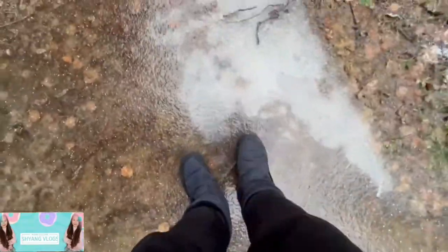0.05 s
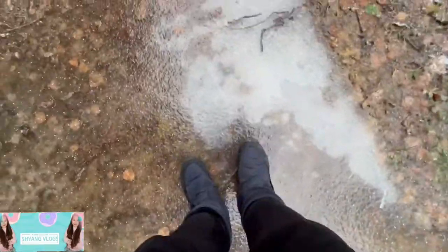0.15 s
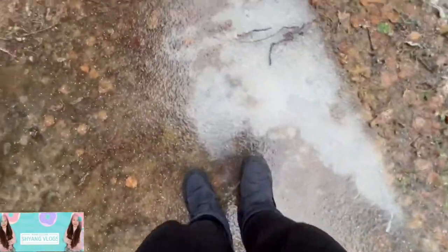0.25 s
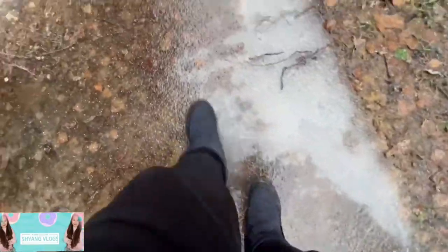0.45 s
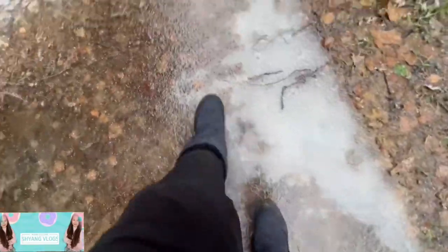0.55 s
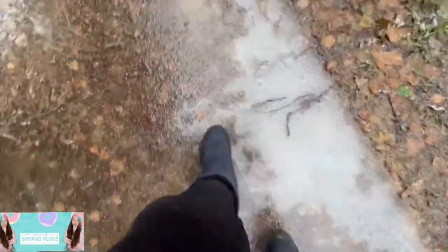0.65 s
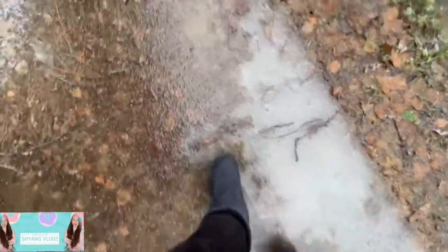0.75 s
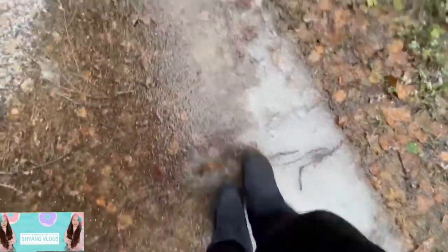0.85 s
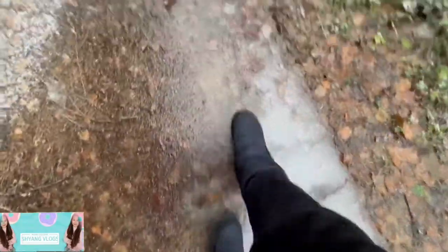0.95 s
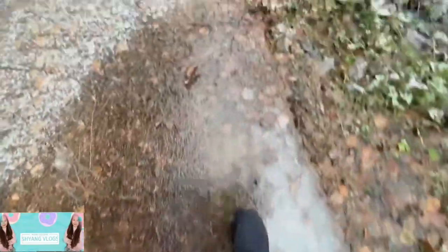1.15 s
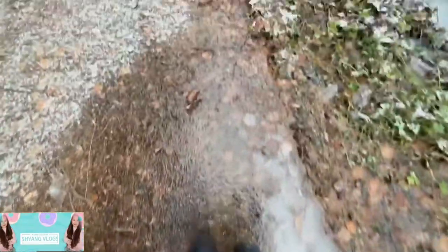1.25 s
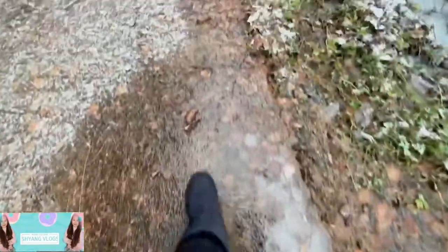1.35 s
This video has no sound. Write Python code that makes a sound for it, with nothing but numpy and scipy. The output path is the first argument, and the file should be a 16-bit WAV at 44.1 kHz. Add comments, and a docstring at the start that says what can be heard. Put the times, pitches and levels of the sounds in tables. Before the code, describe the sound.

Boots step on a frozen puddle outdoors and the thin ice breaks with two loud, sharp cracks, with lighter crackling between them. A rubber sole scuffs faintly, while soft wind and low bumps reach the microphone.

```python
"""Low wind rumble and a faint crackle come first, as boots step onto a thin frozen puddle outdoors.
Each crack is a burst of brittle fractures plus a bending wave, which dispersion in the sheet turns
into a downward chirp; crushed ice fizzes between the cracks. Low thumps reach the microphone above,
mostly at its left port, and later a rubber sole scuffs by stick-slip friction."""
import sys
import numpy as np
from scipy import signal
from scipy.fft import rfft, irfft, next_fast_len
from scipy.io import wavfile
from scipy.ndimage import uniform_filter1d, map_coordinates

SR = 44100
rng = np.random.default_rng(int(sys.argv[2]) if len(sys.argv) > 2 else 0)


def transcribe(u):
    """Save the signal u as a 16-bit wav file named by the first command-line argument.

    u: samples, shape (n,) or (channels, n), limited to [-1, 1]; the rate is SR.
    q: integer samples, one column per channel.
    """
    v = np.clip(np.atleast_2d(u).T, -1, 1)
    q = np.round(v * 32767).astype(np.int16)
    wavfile.write(sys.argv[1], SR, q)


N = 61739
PORT_LAG_S = 0.0001  # a crack reaches the left port this much later than the right


def amp(db):
    """Amplitude ratio of a level in decibels."""
    return 10 ** (np.asarray(db) / 20)


def unit(x):
    """Normalisation to rms 1."""
    return x / np.sqrt(np.mean(x ** 2) + 1e-20)


def along(points, hz):
    """Interpolation of (f/Hz, value) points on a logarithmic frequency axis."""
    f, v = np.transpose(points)
    return np.interp(np.log(hz + 1), np.log(f + 1), v)


def clock():
    """Time of each sample in seconds."""
    return np.arange(N) / SR


def envelope(points):
    """Amplitude envelope through (t/s, level/dB) points."""
    return amp(np.interp(clock(), *np.transpose(points)))


def filtered(x, response):
    """Linear filtering: the spectrum of x times a complex frequency response."""
    m = next_fast_len(N + SR // 4)
    return irfft(rfft(x, m) * response(np.fft.rfftfreq(m, 1 / SR)), m)[..., :N]


def coloured(x, spectrum):
    """Spectral shaping by (f/Hz, relative level/dB) points, at rms 1."""
    return unit(filtered(x, lambda hz: amp(along(spectrum, hz))))


def resonance_db(hz, centre_hz, height_db, octaves):
    """A resonance peak, Gaussian in log frequency."""
    return height_db * np.exp(-(np.log2((hz + 1) / centre_hz) / octaves) ** 2)


def panned(pan_db):
    """Channel gains for a level difference, left minus right."""
    return amp([[pan_db / 2], [-pan_db / 2]])


def noise(correlation):
    """Partly coherent white noise in two channels."""
    a, b = rng.standard_normal((2, N))
    angle = np.arccos(np.clip(correlation, -1, 1)) / 2
    common, opposed = np.cos(angle) * a, np.sin(angle) * b
    return np.array([common + opposed, common - opposed])


def grains(per_s, hiss, correlation):
    """Shot noise: random clicks on a bed of hiss."""
    clicks = noise(correlation) * (rng.random(N) < per_s / SR)
    return unit(clicks) + hiss * noise(correlation)


def patchy(x, depth_db, bins=7, frames=14):
    """Random amplitude modulation in patches of frequency and time."""
    spectra = signal.stft(x, nperseg=256)[2]
    field = rng.standard_normal(spectra.shape[1:])
    field = uniform_filter1d(uniform_filter1d(field, bins, 0), frames, 1)
    return signal.istft(spectra * amp(depth_db * unit(field)), nperseg=256)[1][:, :N]


def wind():
    """Pressure fluctuations of the wind rumble almost independently at the two ports."""
    # strength of the gusts: t/s, level/dB
    gusts = [(0, -47.5), (.12, -50), (.22, -44.5), (.26, -44.5), (.38, -43.5), (.49, -39), (.54, -45.5),
             (.59, -56.5), (.78, -67), (.95, -51.5), (.98, -45.5), (1.06, -44.5), (1.11, -49),
             (1.17, -46.5), (1.28, -53.5), (1.38, -44.5)]
    # rumble spectrum: f/Hz, relative level/dB
    spectrum = [(20, -36), (45, -11), (75, -4), (110, -8), (200, -13.5), (350, -15.5), (700, -32.5),
                (2000, -51)]
    return envelope(gusts) * panned(4) * coloured(noise(correlation=-0.0058), spectrum)


def distant_wash():
    """Steady outdoor background, nearly incoherent between the ports as in a diffuse field."""
    # background spectrum: f/Hz, relative level/dB
    spectrum = [(45, -5.5), (80, 10.5), (115, 2.5), (220, -6.5), (720, -4), (930, -10), (1120, -11),
                (1250, 3), (1450, -12), (1750, -10.5), (2200, -2.5), (2700, -12.5), (6500, -22.5),
                (9000, -35), (11500, -59)]
    return amp(-52) * coloured(noise(correlation=0.057), spectrum)


def crushed_ice(clumps_per_s=210, clump_db=2, treble_db=-49, treble_hz=10900, treble_exponent=2.6):
    """Crushing makes shot noise: a fizz of fine crackle that comes in clumps."""
    # strength of the crushing: t/s, level/dB
    crushing = [(0, -59.5), (.065, -56), (.09, -94), (.15, -73), (.2, -58.5), (.24, -49.5), (.29, -48.5),
                (.40, -58), (.46, -60.5), (.50, -53.5), (.56, -49), (.595, -66.5), (.665, -50.5),
                (.695, -54), (.725, -50.5), (.77, -63), (.87, -53), (.91, -57.5), (.925, -52), (.98, -63.5),
                (1.035, -47.5), (1.10, -50.5), (1.17, -57), (1.4, -65.5)]
    # fizz spectrum: f/Hz, relative level/dB
    spectrum = [(400, 1), (1300, 8.5), (3000, 4), (6000, 3), (9000, -5.5), (11000, -4), (13000, -41),
                (15500, -20)]
    clumps = amp(clump_db * map_coordinates(rng.standard_normal(N // 20), [clock() * clumps_per_s]))
    crackle = patchy(clumps * grains(per_s=2500, hiss=0.82, correlation=0.24), depth_db=3.5)
    crush = envelope(crushing)
    # a thin top-treble hiss comes in when the fizz is loudest
    treble = unit(filtered(crackle, lambda hz: hz ** 4 / (hz ** 4 + treble_hz ** 4)))
    treble_gain = amp(treble_db) * (crush / crush.max()) ** treble_exponent
    return crush * coloured(crackle, spectrum) + treble_gain * treble


def bending_wave(at_s, centre_hz, lag_cycles, half_octaves=1.145, slope=2.3, knee_hz=70.9):
    """Dispersion: high frequencies run faster in a plate; group delay is lag_cycles / (f + knee_hz)."""
    def response(hz):
        octaves = np.abs(np.log2((hz + 1) / centre_hz))
        band = np.exp(-octaves / slope) / np.sqrt(1 + (octaves / half_octaves) ** (2 * slope))
        bass = amp(-15.5) * hz ** 2 / (hz ** 2 + knee_hz ** 2) / (1 + (hz / centre_hz) ** 4)
        port = np.array([[.5], [-.5]])
        cycles = hz * (at_s + port * PORT_LAG_S) + lag_cycles * np.log(1 + hz / knee_hz)
        phase = 2 * np.pi * cycles + port * 0.26  # the left port lags a further 0.26 rad
        return (band + bass) * np.exp(-1j * phase)
    wave = filtered(signal.unit_impulse(N), response)
    return wave / np.abs(wave).max()


def fracture(at_s, decay_s, tilt_db, shard_hz, shard_db, rise_ratio=0.66, snap_s=0.00017):
    """Brittle fracture: tiny breaks build to a burst around one clean snap and excite a shard's mode."""
    # fracture spectrum: f/Hz, relative level/dB
    spectrum = [(200, -18.5), (750, 7), (1500, 4.5), (3000, 1), (4200, 0), (6200, 3.5), (8500, -2),
                (11000, -3), (13000, -10), (15500, -11.5)]
    t = clock() - at_s
    strain = amp(-20) * np.exp(-np.abs(t) / 0.004)  # faint breaks on either side of the burst
    shape = np.exp(-np.maximum(t, -t / rise_ratio) / decay_s) + strain
    breaks = noise(correlation=0.18) * np.exp(0.42 * rng.standard_normal(N)) * shape  # log-normal sizes
    snap = np.array([signal.unit_impulse(N, round((at_s + port * PORT_LAG_S) * SR))
                     for port in (.5, -.5)])
    burst = unit(breaks) + snap_s / decay_s * unit(snap)  # the shorter, the more of it is snap
    def colour(hz):
        shard = resonance_db(hz, shard_hz, shard_db, octaves=0.39)
        return amp(along(spectrum, hz) + shard + tilt_db * np.log2(1 + hz / 1000))
    return unit(filtered(burst, colour)) * np.sqrt(np.mean(shape ** 2))


def cracks(lead_s=0.000783):
    """Impulsive excitation: each crack bends and splinters the sheet."""
    # cracks ahead of their tone colour: t/s; bending wave peak level/dB, centre f/Hz, lag/cycles;
    # burst level/dB, decay t/s, tilt/(dB per octave); shard f/Hz, boost/dB; left minus right level/dB
    events = [(0.0113, -48.5, 970, 1.5, -34.5, 0.0019, 7, 6550, 3, 2),
              (0.0498, -48, 793, 1.2, -34.5, 0.0069, 8.5, 3370, 13.5, -1),
              (0.0567, -41.5, 930, 1.2, -45, 0.0029, 2.5, 3330, 17, -15.5),
              (0.171, -71, 900, 1.3, -39.5, 0.0049, -1, 2290, 23.5, -8.5),
              (.2121, -5, 782, 1.131, -11.5, 0.0015, -1, 2530, 7, 0),
              (0.2248, -60, 900, 0.53, -32.5, 0.0016, 9, 2400, 19, -10),
              (0.2674, -29.5, 770, 1.2, -25, 0.00067, 2.5, 6260, 3.5, -6),
              (.3637, -29, 660, 1.4, -23.5, 0.00082, 3.5, 3600, 3.5, -4),
              (0.444, -31.5, 960, 1.4, -31.5, 0.002, 8, 6600, 0, 1),
              (0.4736, -26.5, 1580, 1.2, -25, 0.0012, 4.5, 2050, 14, -3.5),
              (.5175, -63, 900, 1.6, -39, 0.0028, 8, 3600, 15.5, -3),
              (.5500, -34.5, 1010, 1.6, -37.5, 0.005, 13.5, 4160, 18, -4),
              (0.644, -38.5, 980, 1.19, -37, 0.0031, -6.5, 2180, 7, -5),
              (0.7113, -42.5, 990, 1.2, -38, 0.0011, 3, 7900, 9.5, -7.5),
              (0.9186, -32, 900, 1.2, -31.5, 0.0021, 0.5, 2190, 7.5, 0.5),
              (1.0250, -8.5, 503, 1.5, -13.5, 0.00089, 0.5, 3650, 7.5, -4),
              (1.0555, -38, 1280, 1.2, -46, 0.0025, -15, 1770, 22, -20),
              (1.0650, -18, 740, 1.2, -27, 0.0018, -0.5, 1510, 6, -3.5),
              (1.101, -41, 1000, 1.2, -40, 0.004, -1.5, 2500, -10, -0.5)]
    # tone colour of the cracks, with a peak near 1250 Hz between two dips: f/Hz, level/dB
    tone_colour = [(150, 0), (330, 0.5), (520, -2), (760, -0.5), (980, -6), (1250, -0.5), (1650, -5),
                   (2100, -4), (2800, -1), (5000, -1.5)]
    out = np.zeros((2, N))
    for at_s, bend_db, bend_hz, lag, burst_db, decay_s, tilt_db, shard_hz, shard_db, pan_db in events:
        bend = amp(bend_db) * bending_wave(at_s - lead_s, bend_hz, lag)
        burst = amp(burst_db) * fracture(at_s, decay_s, tilt_db, shard_hz, shard_db)
        out += panned(pan_db) * (bend + burst)
    return filtered(out, lambda hz: amp(along(tone_colour, hz)))


def echo(x):
    """Scattering from ground and bushes: convolution with a short, exponentially decaying noise tail."""
    # time to decay by 60 dB: f/Hz, t/s
    t60 = [(200, 0.019), (1500, 0.048), (6000, 0.031), (14000, 0.053)]
    # colour of the scatter: f/Hz, relative level/dB
    colour = [(200, -7), (1000, -0.5), (2500, -5), (6000, -1), (14000, 1)]
    hz, t, spectra = signal.stft(rng.standard_normal((2, SR // 4)), SR, nperseg=256)
    decay = amp(-60 * t / along(t60, hz)[:, None])
    tail = signal.istft(spectra * decay, SR, nperseg=256)[1]
    scatter = signal.fftconvolve(x, tail / np.linalg.norm(tail[0]), axes=1)[:, :N]
    return filtered(scatter, lambda f: amp(along(colour, f)))


def thumps(sag_per_s=57.6, roughness=0.4, right_db=-10.5):
    """Gaussian wave packets: dull knocks that sink in pitch, weaker and inverted at the right port."""
    # knocks at the microphone: centre t/s, level/dB, f/Hz, half-length t/s
    knocks = [(0.054, -29, 165, 0.0069), (0.264, -24, 91, 0.0075), (0.303, -28, 107, 0.015),
              (.349, -20, 185, 0.0058), (0.407, -23, 118, 0.0053), (0.449, -26, 106, 0.0044),
              (.465, -22.5, 165, 0.0037), (0.4886, -13, 218, 0.0042), (0.518, -28.5, 178, 0.0029),
              (0.933, -31.5, 247, 0.0016), (1.138, -40, 139, 0.0035), (1.154, -36, 133, 0.0079),
              (1.212, -20, 203, 0.0048)]
    left = np.zeros(N)
    for at_s, db, hz, width_s in knocks:
        t = np.clip(clock() - at_s, -5 * width_s, 5 * width_s)
        cycles = hz * (1 - np.exp(-sag_per_s * t)) / sag_per_s
        rough = unit(filtered(rng.standard_normal(N), lambda f: 1 / (1 + (f / (2 * hz)) ** 4)))
        packet = amp(db) * np.exp(-(t / width_s) ** 2)
        left += packet * (np.cos(2 * np.pi * cycles) + roughness * rough)
    return np.array([left, -amp(right_db) * left])


def scuffs(attack_share=0.21, release_share=0.97):
    """Stick-slip friction: each slip rings the rubber sole at its own pitch."""
    # slips of the sole: t/s, length t/s, level/dB, resonance f/Hz
    slips = [(0.8531, 0.0093, -37.5, 740), (0.863, 0.033, -40, 530), (0.897, 0.006, -40.5, 430),
             (0.904, 0.022, -41.5, 510), (1.307, 0.051, -46.5, 606), (1.339, 0.0026, -38, 610)]
    # spectrum of the sole: f/Hz, relative level/dB
    sole = [(120, -12), (340, 2), (750, -4), (1000, -8.5), (1350, -7.5), (1750, -15), (2200, -10.5),
            (2900, -23.5), (12000, -65)]
    out = np.zeros((2, N))
    for at_s, length_s, db, sole_hz in slips:
        progress = (clock() - at_s) / length_s
        attack = np.clip(progress / attack_share, 0, 1)
        release = np.exp(-np.maximum(progress - .5, 0) / release_share)
        friction = grains(per_s=510, hiss=0.6, correlation=0.94)
        squeak = filtered(friction, lambda hz: amp(resonance_db(hz, sole_hz, height_db=7, octaves=0.74)))
        out += amp(db) * attack * release * coloured(squeak, sole)
    return out


def scene():
    """Superposition of ice, echo, boots and the air around them."""
    ice = cracks()
    return ice + amp(-4) * echo(ice) + crushed_ice() + scuffs() + thumps() + wind() + distant_wash()


def record(dry):
    """Frequency response of the microphone: each port colours the treble, up to a band limit."""
    # response of the left port: f/Hz, level/dB
    left = [(1000, -1), (4300, 1), (5100, -3.5), (6100, 1.5), (7100, -4.5), (8500, 3), (10500, -5)]
    # response of the right port: f/Hz, level/dB
    right = [(1000, -1), (4300, -0.5), (5000, -5), (5700, 1), (7100, -6.5), (8500, 7.5), (10500, -6)]
    return filtered(dry, lambda hz: amp([along(left, hz), along(right, hz)]) * (hz < 16100))


dry = scene()
out = record(dry)
transcribe(out)
```